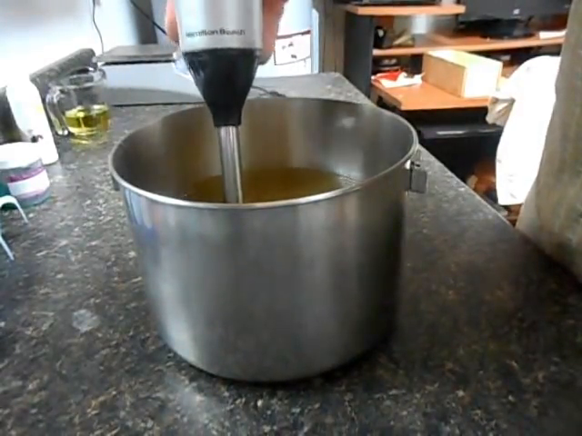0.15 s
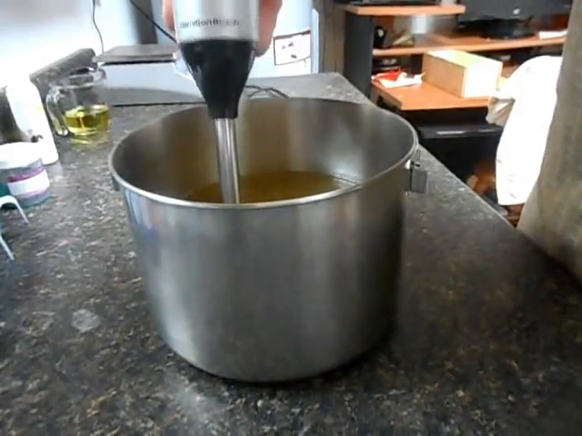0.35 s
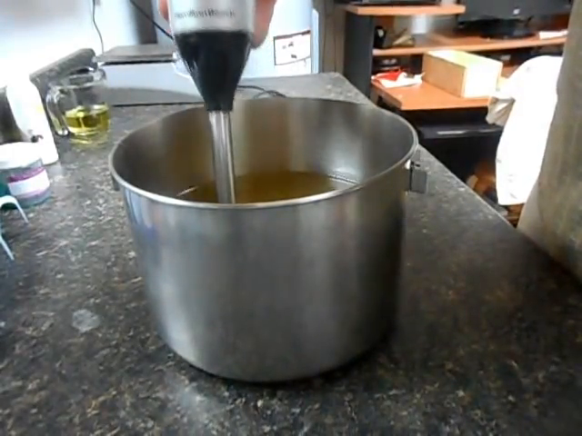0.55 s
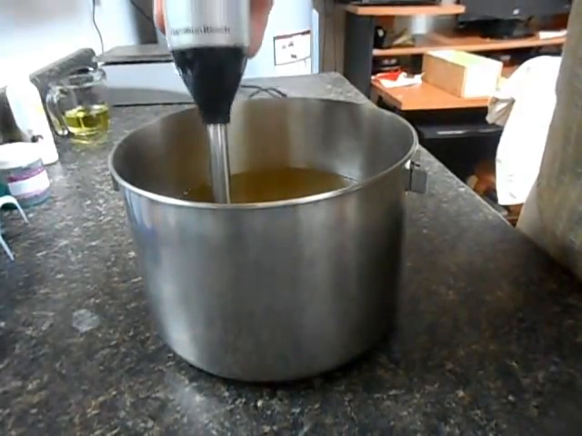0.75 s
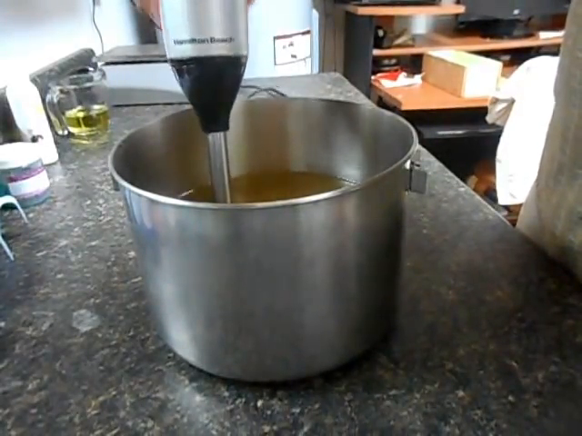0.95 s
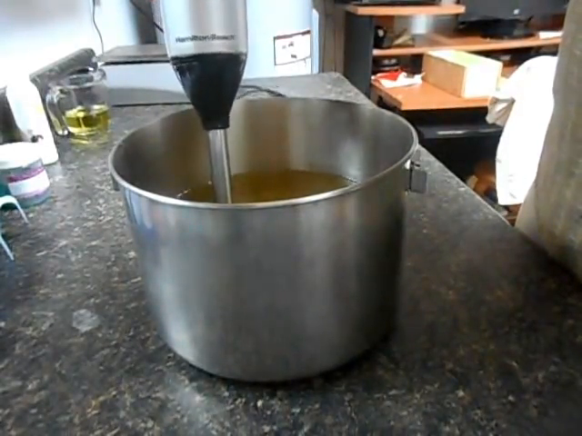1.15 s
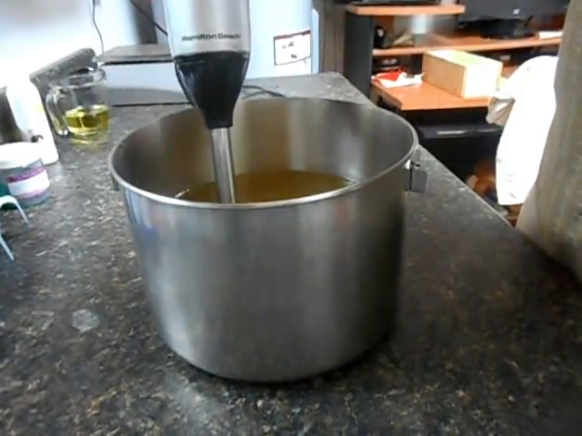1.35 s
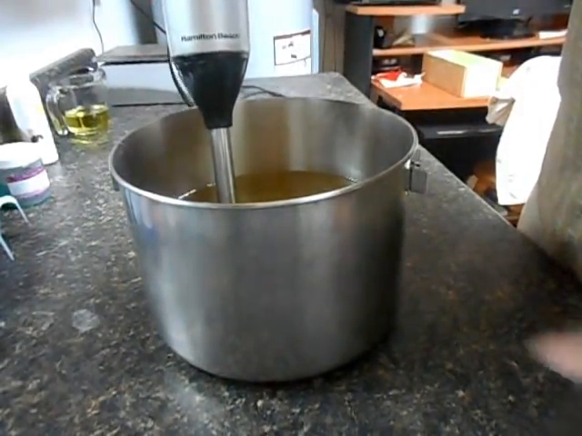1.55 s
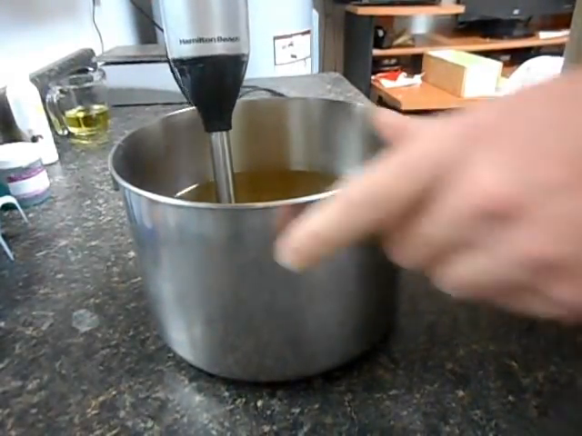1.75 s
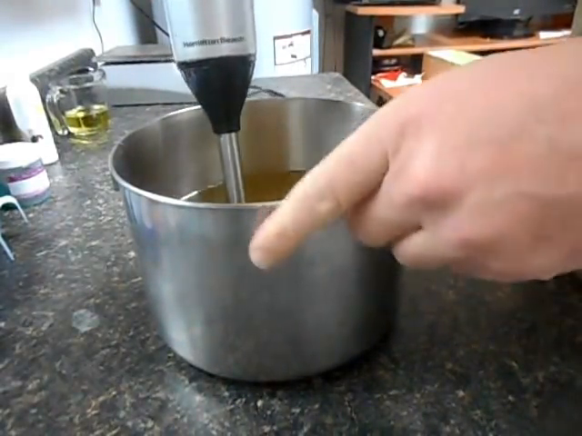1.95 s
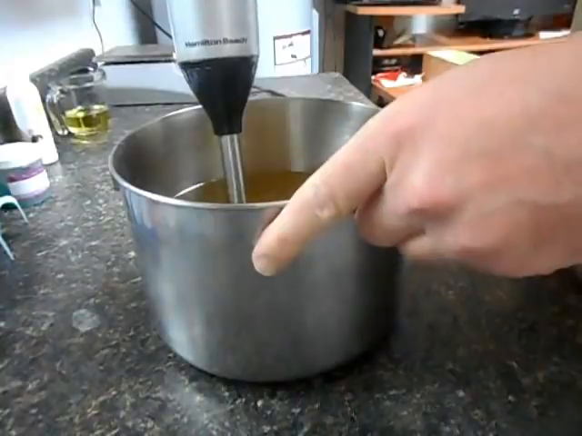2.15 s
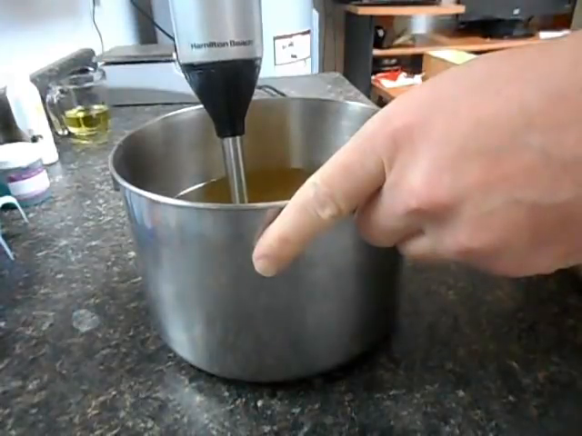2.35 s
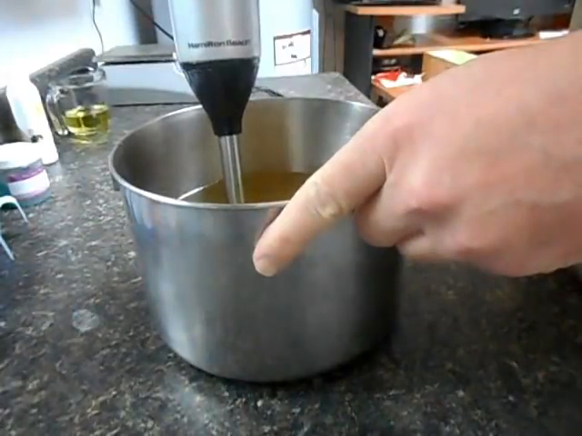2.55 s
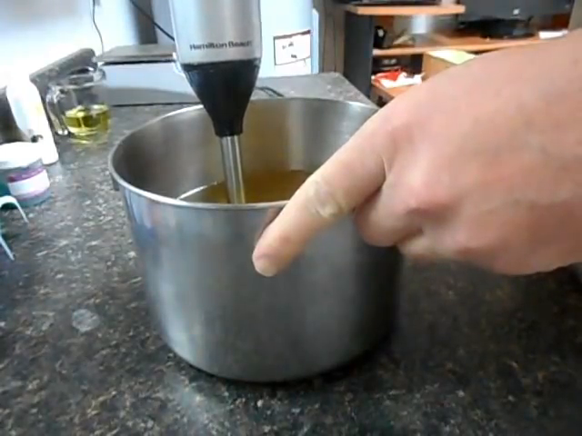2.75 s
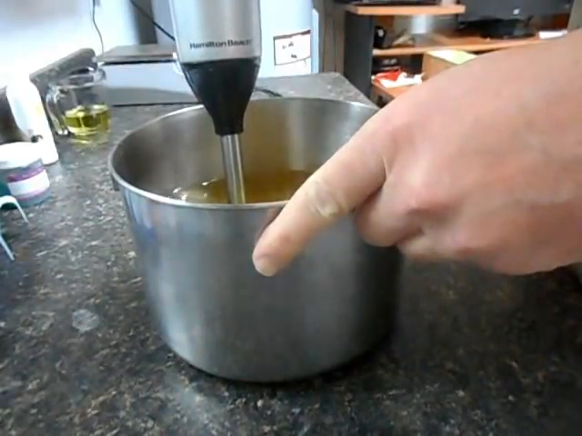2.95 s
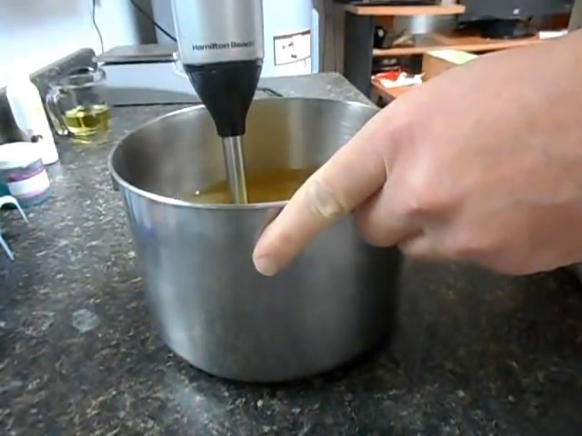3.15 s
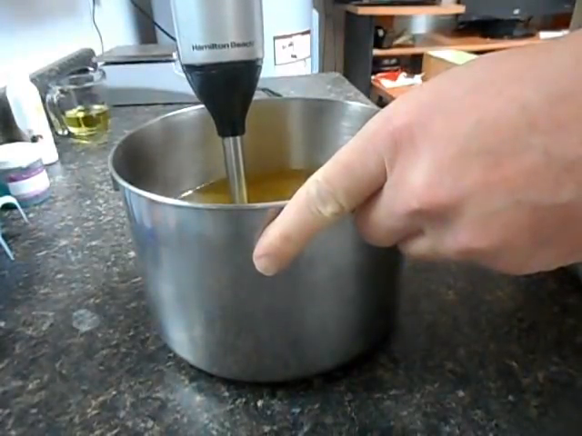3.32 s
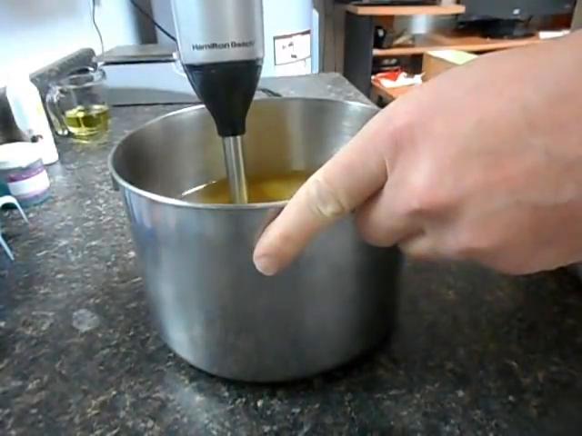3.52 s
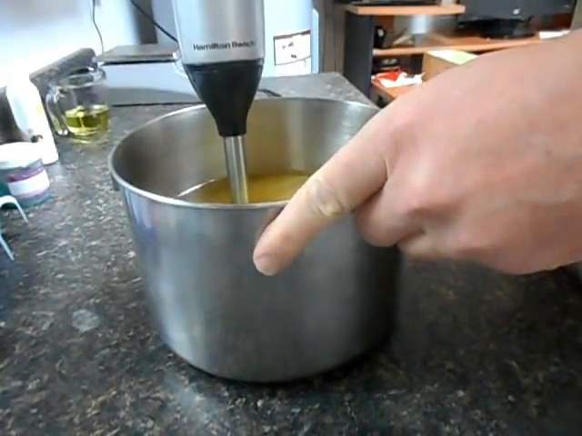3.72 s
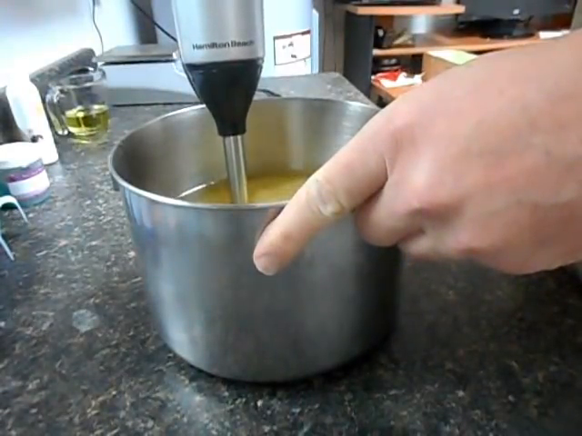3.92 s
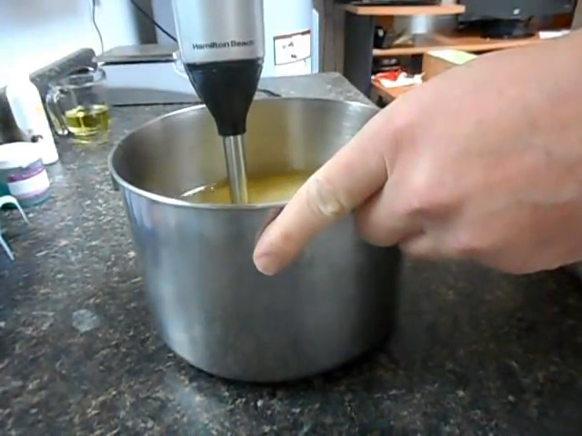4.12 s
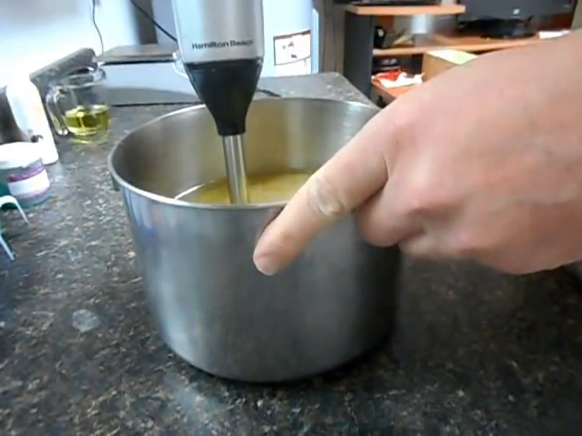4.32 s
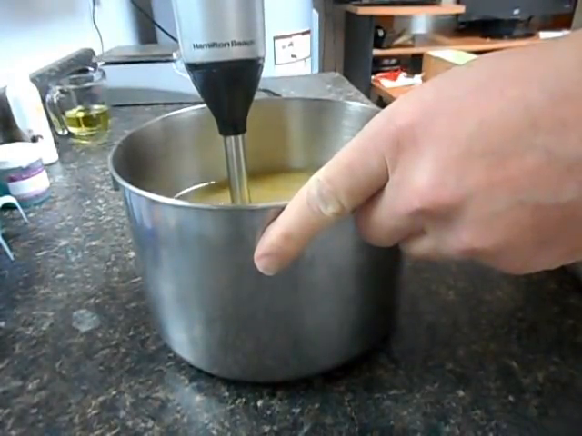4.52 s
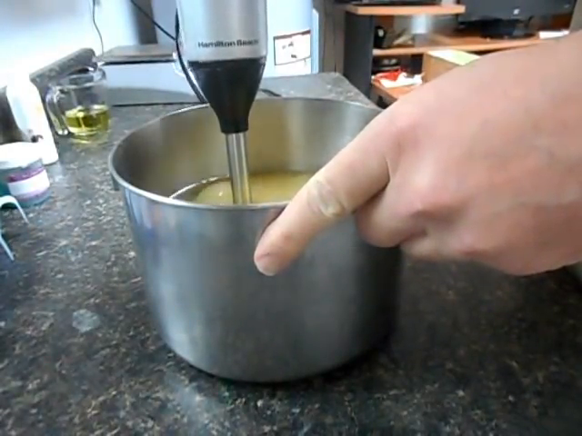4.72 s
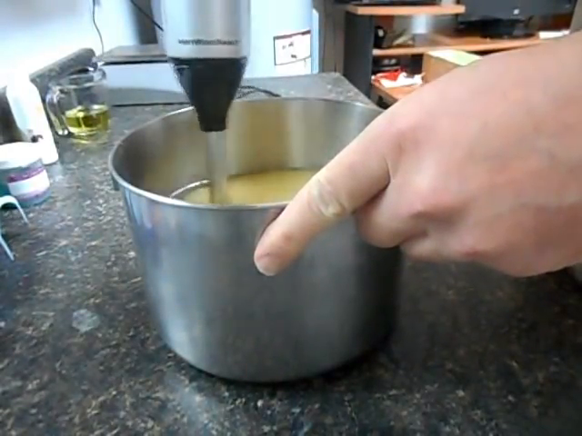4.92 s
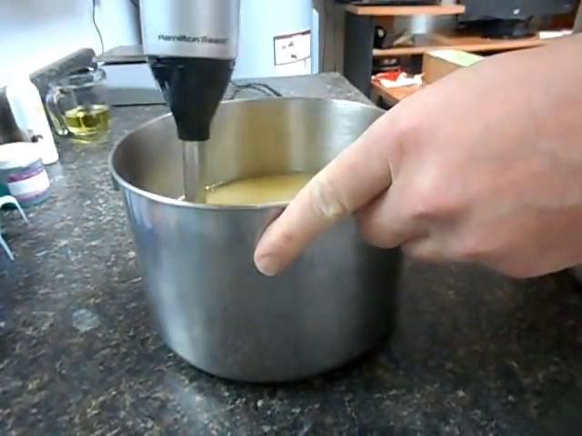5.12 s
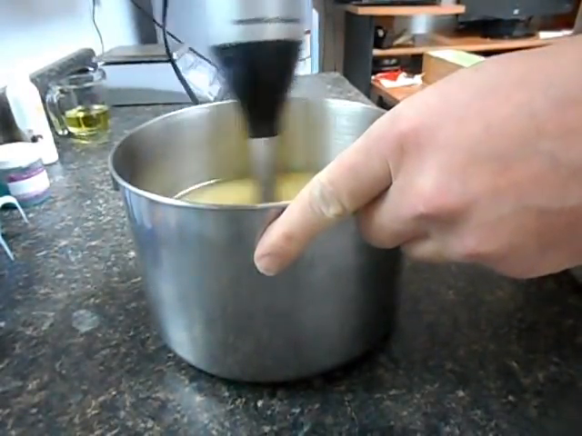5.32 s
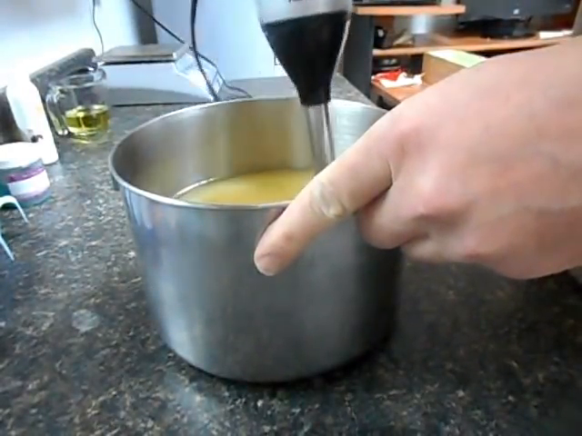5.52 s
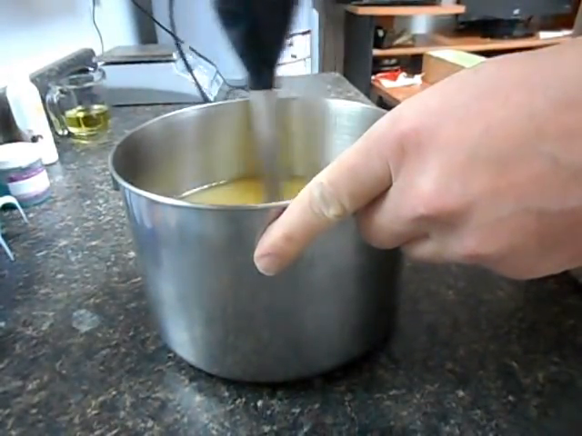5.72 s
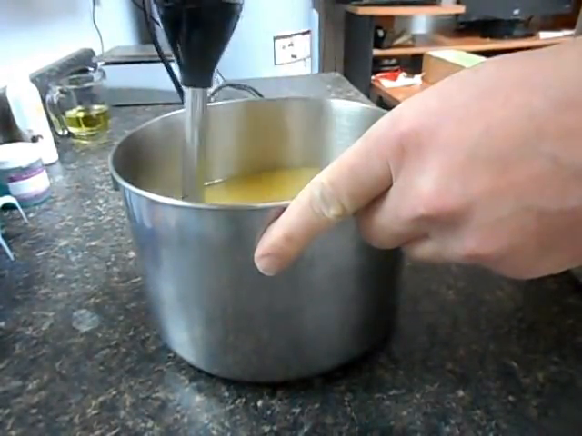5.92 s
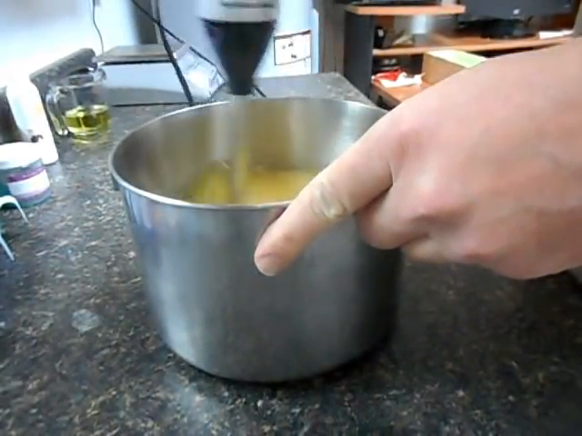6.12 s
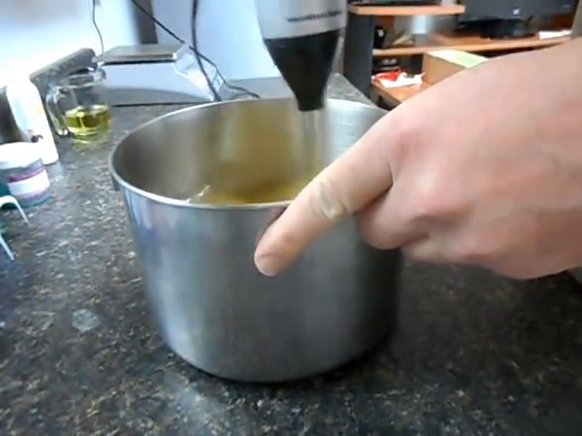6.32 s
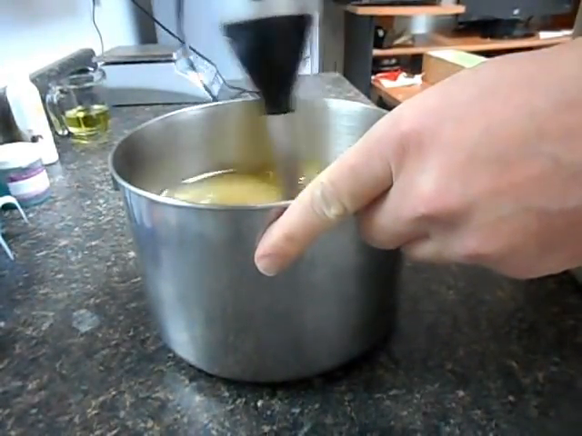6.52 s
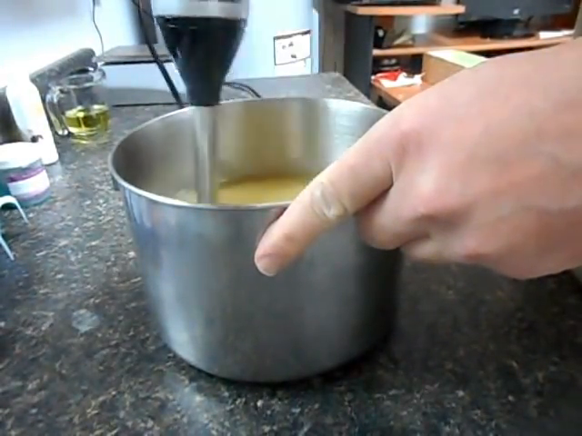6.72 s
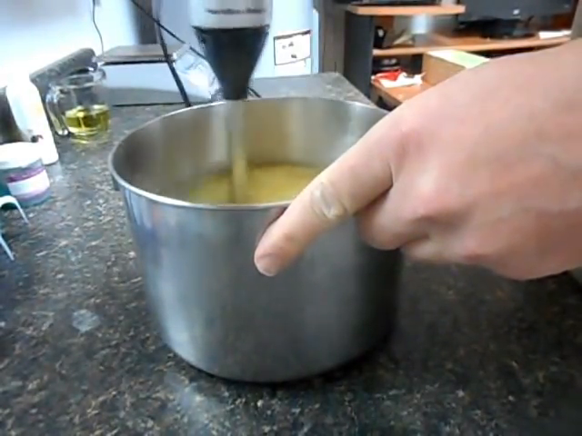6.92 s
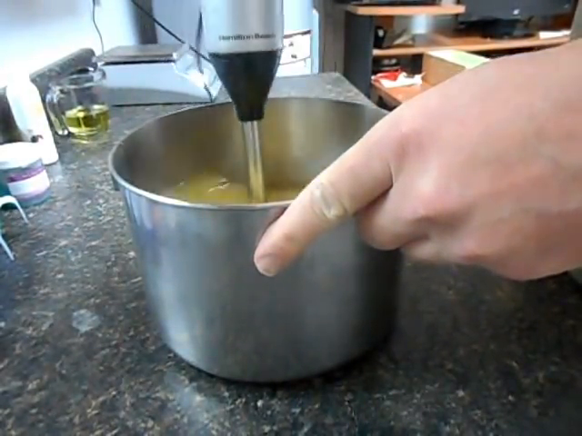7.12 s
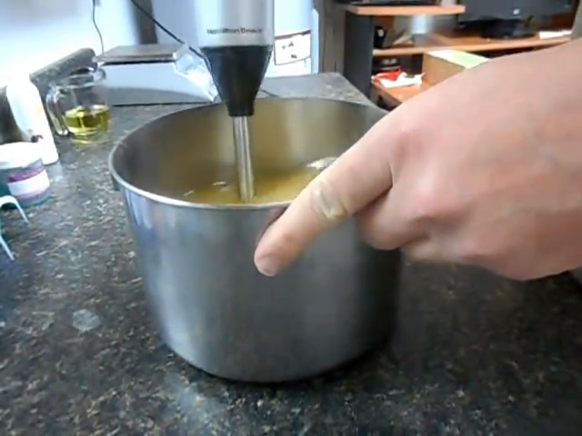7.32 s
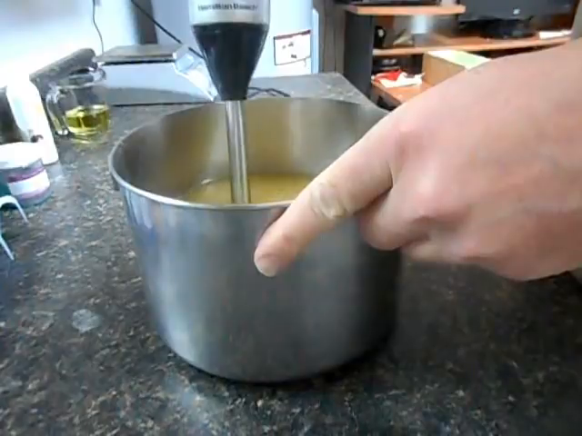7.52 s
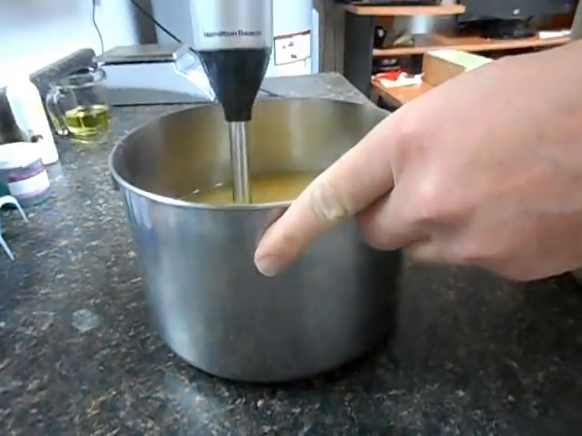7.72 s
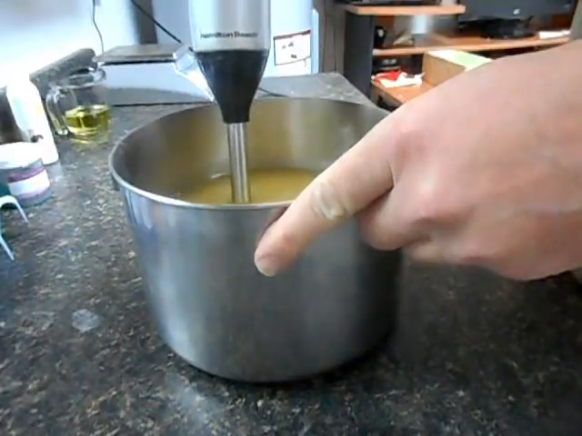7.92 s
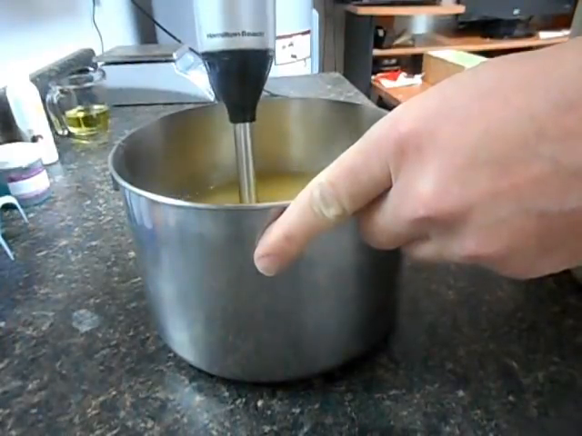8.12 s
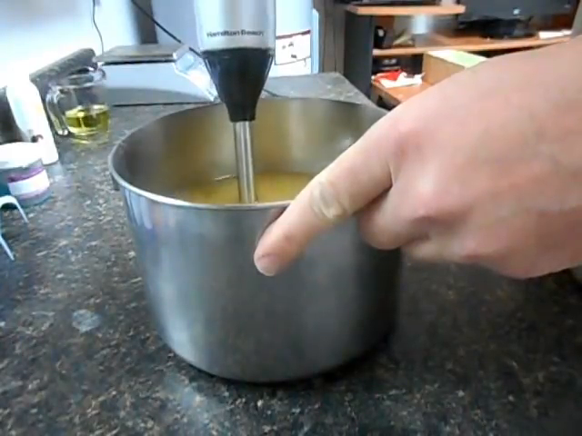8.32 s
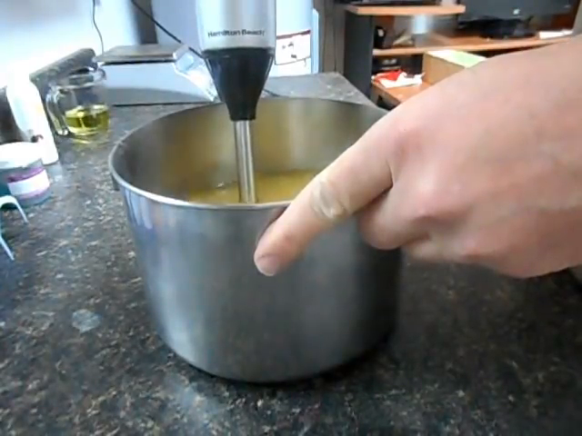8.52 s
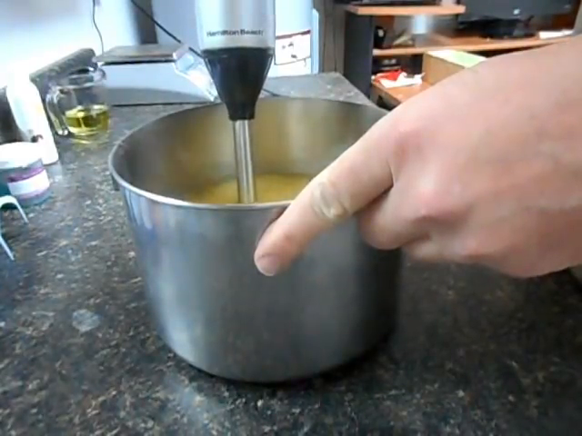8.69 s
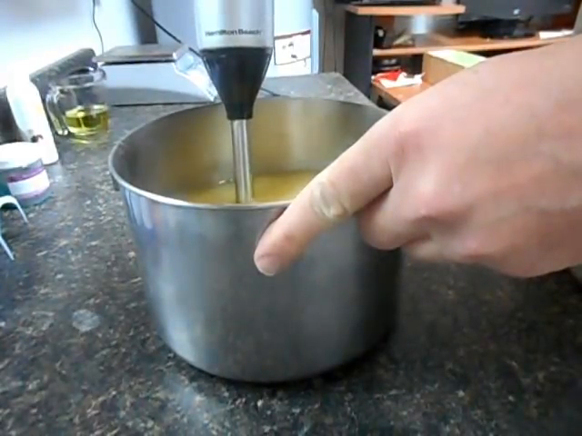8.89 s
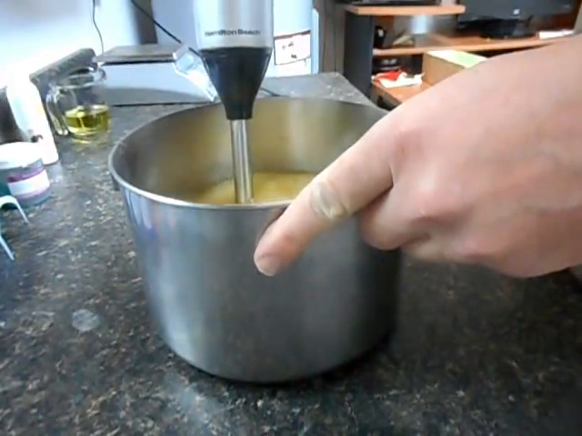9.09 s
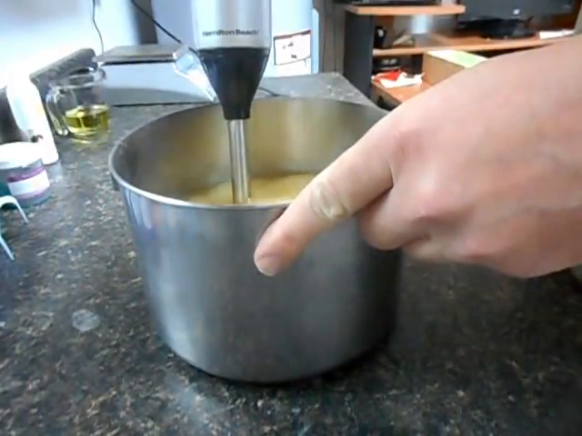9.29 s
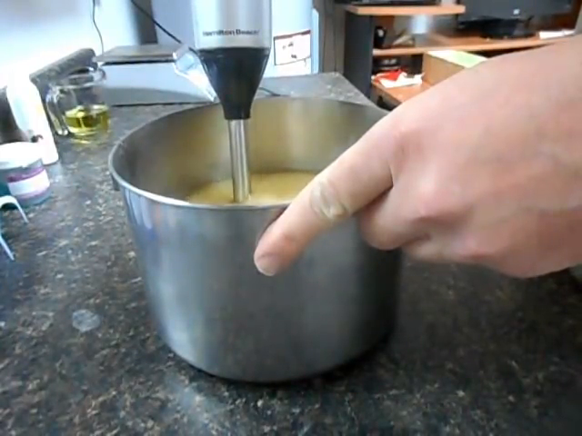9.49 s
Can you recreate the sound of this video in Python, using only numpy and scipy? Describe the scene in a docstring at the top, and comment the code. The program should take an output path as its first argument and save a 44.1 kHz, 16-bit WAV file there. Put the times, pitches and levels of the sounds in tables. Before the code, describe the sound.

A close small microphone in a kitchen with short reverberation and a low steady hiss. A gritty metal scrape at 0.2 s leads to ringing clanks on a steel pot at about 0.5 and 0.9, then light ticks. A sharp loud click near 1.9 starts a stick blender in oil: its pitch leaps up with a rattling shudder, is cut at about 2.05 and sags, grinding and gurgling. At 2.45 it spins up again and holds a steady buzz near 200 hertz under a throbbing wet roar until 4.4. Then it coasts down over about a second with a descending thin whine. Squeaky scrapes come around 5.0 to 5.1, a duller knock and scrape near 5.5, and faint taps until 7. Hard knocks and short squeaks fall at 7.2 and 7.7. At 7.95 the motor starts again, brighter, and runs steadily to the end at about 9.6.

```python
"""Knocks, scrapes and ticks on a steel pot, then a stick blender's motor run three times in oil, close by in a
kitchen. The contact sounds are excited modes of the pot: friction noise, short clicks and decaying sinusoids;
two of the ticks are the blender's trigger clicking as the motor starts from rest. The motor is a sum of
harmonics of the shaft speed in a churning roar that throbs with the turns. Each press spins the shaft up; each
release lets it coast, with commutator whine as it slows. A decaying-noise room, a steady kitchen background and
a small microphone's response complete it."""
import sys
import numpy as np
from scipy import signal
from scipy.fft import rfft, irfft, next_fast_len
from scipy.io import wavfile
from scipy.ndimage import uniform_filter1d, map_coordinates

SR = 44100
rng = np.random.default_rng(int(sys.argv[2]) if len(sys.argv) > 2 else 0)


def materialize(psi):
    """Save the field psi as 16-bit PCM at rate SR to the path in sys.argv[1].

    A 1-D psi becomes a single channel; in a 2-D psi each row is a channel.
    """
    bounded = np.clip(np.atleast_2d(psi).T, -1, 1)
    quanta = np.round(bounded * 32767).astype(np.int16)
    wavfile.write(sys.argv[1], SR, quanta)


N = 421155
T = np.arange(N) / SR  # seconds


def amp(db):
    """Decibel law: the amplitude gain of a level in dB."""
    return 10 ** (np.asarray(db) / 20)


def unit(x):
    """Normalisation of signal power: x at rms 1."""
    return x / np.sqrt(np.mean(x ** 2) + 1e-20)


def along(points, hz, axis=1):
    """Interpolation on a logarithmic frequency axis, for one column of (Hz, value, ..) points."""
    columns = np.transpose(points)
    return np.interp(np.log(hz + 1), np.log(columns[0] + 1), columns[axis])


def curves(rows, at):
    """Linear interpolation of each column after the first, which is the abscissa."""
    abscissa, *columns = np.transpose(rows)
    return [np.interp(at, abscissa, column) for column in columns]


def wobble(rate, size=N):
    """Slow random modulation: a smooth curve through `rate` random knots a second."""
    coarse_t = T[:size + 16:16]
    knots = rng.standard_normal(int(size * rate / SR) + 4)
    return np.interp(T[:size], coarse_t, map_coordinates(knots, [coarse_t * rate]))


def filtered(x, response):
    """Linear filtering: the spectrum of x times a response of frequency."""
    m = next_fast_len(len(x) + 8192)
    return irfft(rfft(x, m) * response(np.fft.rfftfreq(m, 1 / SR)), m)[:len(x)]


def noise(points, size=N, tilt_db=0):
    """Spectral shaping of white noise, to rms 1; tilt_db per octave pivots near 2 kHz."""
    def response(f):
        return amp(along(points, f) + tilt_db * np.log2((f + 50) / 2000))
    return unit(filtered(rng.standard_normal(size), response))


# Background spectrum. Each row: frequency [Hz], relative spectral density [dB].
KITCHEN_SPECTRUM = [(30, -23), (100, -9), (170, -15.5), (260, -9.5), (400, -8.5), (800, -4), (1400, -6),
                    (2000, -6), (4600, -12), (8000, -17), (16000, -28.5)]
# Background level before its random drift. Each row: time [s], level [dB].
KITCHEN_LEVEL = [(0, -53.5), (1, -55.5), (1.8, -53.5), (5.3, -49), (5.7, -55.5), (6.3, -55.5), (6.8, -56),
                 (7.6, -54), (9.55, -60)]


def kitchen_air():
    """Stationary broadband noise whose level drifts slowly: the kitchen background."""
    drift_db = .8 * wobble(6)
    return amp(curves(KITCHEN_LEVEL, T)[0] + drift_db) * noise(KITCHEN_SPECTRUM)


# Resonances of the steel pot. Each row: frequency [Hz], relative level [dB], free decay t60 [s].
POT_MODES = [(312, -26, 0.34), (470, -24.5, .25), (604, -12, 0.28), (878, -17.5, 0.23), (1140, -12.5, .2),
             (1450, -19, .2), (1790, -13, .2), (1810, -5, 0.28), (2010, -14.5, 0.59), (2164, 0, 0.067),
             (2138, 3, 0.25), (2324, -4.5, 0.66), (2570, -5.5, 0.75), (3139, -7, 0.18), (3380, -8, 0.22),
             (3560, -6.5, 0.21), (4050, -32, .25), (4860, -16.5, 0.58), (4610, -11, .25),
             (5400, -16, 0.074), (5890, -20, 0.26), (6005, -21, .2), (6600, -31, 0.32), (7440, -28, 0.1)]


def pot_hiss(wide, size):
    """Forced resonance: noise rubbed into the pot modes, which the contact broadens `wide` times."""
    def modes(f):
        total = 0
        for k, (centre, db, t60) in enumerate(POT_MODES):
            damping = 1j * f * wide / t60
            total = total + (-1) ** k * amp(db) * damping / (centre * centre - f * f + damping)
        return total
    return unit(filtered(rng.standard_normal(size), modes))


# Broad contact noise of metal on metal. Each row: frequency [Hz], relative spectral density [dB].
CONTACT_SPECTRUM = [(100, -16), (400, -4.5), (1200, 3.5), (2200, -1), (3500, -0.5), (6000, -9),
                    (9000, -18.5), (16000, -30.5)]
# Slides of the guard along the pot. Each row: loudest moment [s], rise [s], fade [s],
# level [dB], squeak pitch [Hz], squeak relative to the grit [dB].
SLIDES = [(.225, .085, .07, -25, 3300, -9), (1.18, .02, .2, -51, 1390, -6),
          (4.931, .15, 0.18, -41, 2100, -12), (5.06, .12, 0.15, -29.5, 1380, -0.5),
          (5.125, 0.092, .03, -32.5, 2100, -1), (5.505, .01, 0.12, -37.5, 985, -1),
          (7.02, 0.0092, 0.19, -50, 1150, -1), (7.2, 0.017, 0.139, -30, 1180, -2),
          (7.305, 0.015, 0.15, -36, 1250, 1), (7.639, .03, .15, -56, 854, 7),
          (7.79, 0.025, .18, -39, 745, 1), (7.866, .01, 0.074, -39, 747, -5)]
SLIDE_DB, SLIDE_ROUND = 23.5, 1.27  # dB fallen one rise or fade from the top; roundness of the top


def scrapes():
    """Dry friction: grit drives the pot modes while a rough squeak sounds; each slide swells and fades."""
    out = np.zeros(N)
    for s, rise_s, fade_s, db, squeak_hz, squeak_db in SLIDES:
        first = max(round((s - 2 * rise_s) * SR), 0)
        t = T[first:round((s + 2 * fade_s) * SR)]
        n = len(t)
        slide_db = db - SLIDE_DB * np.maximum((s - t) / rise_s, (t - s) / fade_s) ** SLIDE_ROUND
        squeak_phase = 2 * np.pi * squeak_hz * t + 2.2 * wobble(110, size=n)
        squeak = amp(squeak_db) * (1 + 0.32 * wobble(60, size=n)) * np.sin(squeak_phase)
        grit = .8 * pot_hiss(30., size=n) + .3 * noise(CONTACT_SPECTRUM, size=n)
        out[first:first + n] += amp(slide_db + 3.5 * wobble(150, size=n)) * (grit + squeak)
    return out


# Light ticks and taps, among them the trigger's click at 1.856 s and 7.945 s as the motor starts from rest.
# Each row: start [s], level [dB], note pitch [Hz], note level before the tick gain [dB], counter thud relative
# to the tick gain [dB].
TAPS = [(.118, -25.5, 1960, -6, -11), (1.081, -35, 1660, 1, -23), (1.094, -35, 1680, -9, -14),
        (1.339, -14, 2800, 1.5, -35), (1.557, -32, 3290, -10, -25), (1.673, -22.5, 1140, -14, -49),
        (1.856, -9.5, 5960, -6.5, -27), (1.938, -1, 3440, 13, -45), (2.331, -14.5, 2980, 2, -45),
        (5.129, -33.5, 1830, -6, -7), (5.266, -35.5, 4730, -9, -27), (5.578, -22, 2000, -10, -18),
        (5.608, -32.5, 1710, 7, -9), (5.953, -37.5, 1420, 5.5, -18), (5.992, -40, 1400, 8.5, -30),
        (6.116, -42.5, 1800, -4, -32), (6.352, -35, 4140, -16, -16), (6.714, -42.5, 1580, -3, -8),
        (6.832, -39, 1380, 11, -30), (6.867, -40, 1230, 1, -30), (6.901, -32.5, 1800, -1, -35),
        (6.97, -34, 1100, -9.5, -29), (7.015, -36, 1120, -1, -15), (7.032, -43, 1506, 13, -27),
        (7.147, -26.5, 1760, -15, -23), (7.375, -43, 1550, 14, -26), (7.834, -24, 3270, -6, -27),
        (7.945, -28.5, 5950, 6, -15)]
# t60 of a soft tick with a 0 dB note, s; its shortening in dB (20 log) per dB of note,
# and per dB of force above the soft level
TICK_S, TICK_SHORTENS, HARD_SHORTENS, SOFT_DB = 0.035, 0.23, 0.24, -32


def ticks():
    """Light impact: a short broad click, a damped note and a soft thud in the counter."""
    out, t = np.zeros(N + SR), T[:SR // 6]
    for s, db, hz, note_db, thud_db in TAPS:
        force_db = max(db - SOFT_DB, 0)
        t60 = TICK_S * amp(-TICK_SHORTENS * note_db - HARD_SHORTENS * force_db)
        note = amp(note_db) * np.sin(2 * np.pi * hz * t + 1.8 * wobble(500, size=len(t)))
        click = 0.45 * noise(CONTACT_SPECTRUM, size=len(t), tilt_db=4.5)
        struck = (note + click) * amp(-60 * t / t60) * (1 - np.exp(-t / 0.00091))
        thud = amp(thud_db - 60 * t / 0.078) * np.sin(2 * np.pi * 160 * t) * (1 - np.exp(-t / 0.0039))
        out[round(s * SR):][:len(t)] += amp(db) * (struck + thud)
    return out[:N]


# The two slowest wall modes, which beat together. Each row: frequency [Hz], t60 [s].
WALL_MODES = [(275, 0.12), (291, 0.23)]
# Hard knocks of the shaft on the pot. Each row: start [s], relative blow level [dB], tilt [dB per octave],
# relative ringing [dB], relative wall wobble [dB], counter thud independent of the blow [dB].
BLOWS = [(.247, -21.5, -6.5, -16, -8, -33), (.489, 2, 3, 1, -19, -42), (.867, 1, 3.5, 2, -23.5, -42),
         (.944, -18, -3, -11, -10.5, -41.5), (5.494, -20, 2, -20, -27, -67), (7.171, 1, 1.5, -16, -50, -34),
         (7.426, -18.5, -1, -15, -16, -32), (7.739, -1, 2, -1.5, -51, -41),
         (7.748, -9.5, -3.5, 4, -45, -54)]
CLANG_S = 0.034  # time for the clang to fall 60 dB
LINGER_DB, LINGER_GROWS = -24.5, -0.28  # the lasting ring grows less than the blow


def knocks():
    """Modal impact: a broad clang that drops quickly, a fluttering ring, a wobbling wall and a thud."""
    out, t = np.zeros(N + SR), T[:SR // 2]
    hz, level, long = np.transpose(POT_MODES)[:, :, None]
    fast = amp(-60 * (t / CLANG_S) ** 2)  # the clang stays full for a moment, then drops quickly
    for s, db, tilt_db, ring_db, wall_db, thud_db in BLOWS:
        linger_db = LINGER_DB + LINGER_GROWS * db
        size = amp(level + tilt_db * np.log2(hz / 2000) + rng.normal(0, 2.8, hz.shape))
        decay = fast + amp(linger_db - 12 - 60 * t / long)
        ring = size * np.sin(2 * np.pi * hz * t + rng.normal(0, 1.5, hz.shape)) * decay
        # the many close modes, heard as a shimmer
        flutter = amp(linger_db + 3 - 60 * t / .3) * pot_hiss(30., size=len(t))
        clang = noise(CONTACT_SPECTRUM, size=len(t), tilt_db=tilt_db)
        clang = clang * (fast + amp(linger_db - 2.0 - 60 * t / .25))
        wall = sum(np.sin(2 * np.pi * f * t) * amp(-60 * t / slow) for f, slow in WALL_MODES)
        thud = amp(thud_db - 60 * t / 0.19) * np.sin(2 * np.pi * 167 * t)
        blow = clang + amp(ring_db) * (ring.sum(0) + flutter) + amp(wall_db + 8.0) * wall
        onset = 1 - np.exp(-t / 0.00075)
        out[round(s * SR):][:len(t)] += (amp(db - 10.0) * blow + thud) * onset
    return out[:N]


# Presses of the trigger. Each row: on [s], off [s], settled full speed [turns per s], spin-up time [s].
TRIGGER = [(1.856, 2.055, 200, .18), (2.452, 4.42, 198.6, .14), (7.951, 9.6, 196.6, .15)]
KICK = 62  # turns per s that the rotor leaps to from rest
OVERSHOOT, SETTLE_S = .014, .35  # share over full speed until the oil is dragged along; its time constant
COAST_S, DRAG = .5, 25  # speed plus the friction term DRAG (turns per s) dies with time constant COAST_S


def shaft():
    """Rotational dynamics: spin-up against oil, then coasting against friction; speed, drive, last press."""
    hz, press = np.zeros(N), np.zeros(N, int)
    for k, (on, off, full, spin_s) in enumerate(TRIGGER):
        start = np.arctanh(max(hz[round(on * SR)], KICK) / full)
        top = full * (1 + OVERSHOOT * np.exp(-np.clip(T - on, 0, None) / SETTLE_S))
        driven = top * np.tanh(start + (np.minimum(T, off) - on) / spin_s)
        after = (driven + DRAG) * np.exp(-np.clip(T - off, 0, None) / COAST_S) - DRAG
        hz = np.where(T >= on, np.clip(after, 0, None), hz)
        press = np.where(T >= on, k, press)
    off_s = np.transpose(TRIGGER)[1][press]
    power = uniform_filter1d(1. * (T < off_s) * (hz > 0), size=1800)
    return hz, power, press


# Body response to the shaft orders. Each row: frequency [Hz],
# relative level in the first two presses [dB], relative level in the third press [dB].
BODY = [(50, -27, -20), (109, -17.5, -16), (156, -10, -13), (207, -17.5, -20.5), (309, -6, -12.5),
        (388.5, -16.5, -12), (463, 2, -7.5), (590, 0, -14.5), (800, -0.5, -16), (1000, -6, -55),
        (1192, 0, 4), (1380, -4, -5), (1800, -1.5, -3), (2800, -4, -11)]
# Brief changes of one shaft order. Each row: centre [s], order [multiple of shaft speed],
# level change [dB], Gaussian half length [s].
ORDER_SWELLS = [(2.83, 4, 10, .13), (2.76, 3, -8, .1), (8.1, 1, 10, .04), (8.24, 3, 10, .16),
                (8.25, 4, 6, .2)]
WALL_LIFT_DB, WALL_LIFT_HZ, WALL_WIDTH_HZ = 5.5, 330, 31  # an order sweeping through the wall modes is lifted
SLOSH = .6  # cap on the smear of the orders once the oil sloshes round a slowing blade


def shaft_orders(hz, turn, power, press, rough, low_db, upper_db):
    """Harmonics of rotation: sines at multiples of the shaft angle, coloured by the body resonances."""
    hum = np.zeros(N)
    slosh = (1 - power) * np.clip(3 * (1 - hz / hz.max()), 0, SLOSH)
    for k in range(1, 15):
        body_db = np.where(press < 2, along(BODY, k * hz, axis=1), along(BODY, k * hz, axis=2))
        size = (low_db if k < 4 else upper_db) - 3.5 + body_db + 1.5 * wobble(9)
        size += WALL_LIFT_DB * np.exp(-((k * hz - WALL_LIFT_HZ) / WALL_WIDTH_HZ) ** 2)
        for s, order, db, half in ORDER_SWELLS:
            if round(order) == k:
                size += db * np.exp(-((T - s) / half) ** 2)
        smear = np.maximum(rough, slosh) * min(k - 1, 4) * wobble(50) * .75
        hum += amp(size) * np.sin(k * turn + smear + 2 * np.pi * rng.random())
    return hum


MAINS_HZ, SIDEBAND_DB = 60, -21


def mains_sidebands(turn, power, rough):
    """Modulation by the supply: under power, orders 4-7 each gain a tone one mains step below."""
    out = np.zeros(N)
    for k in range(4, 8):
        phase = k * turn - 2 * np.pi * MAINS_HZ * T + wobble(20)
        out += power * (1 - rough) * amp(SIDEBAND_DB + 3.5 * wobble(12)) * np.sin(phase)
    return out


# How well the housing lets the whine out. Each row: frequency [Hz], relative level [dB].
HOUSING_RESPONSE = [(1500, -25), (2800, -8), (3500, 0), (4400, -1), (5200, 0), (7000, -7), (9000, -16),
                    (12000, -40)]
# Brush whine while coasting. Each row: shaft speed [turns per s], relative level [dB].
BRUSH_WHINE = [(22, -60), (32, -12), (45, -1), (118, -2), (132, -14), (165, -40)]
BARS = 11  # commutator bars


def commutator_whine(hz, turn, power, grind):
    """Periodic contact: brushes tick over the bars as the motor coasts, giving multiples of the bar rate."""
    out = np.zeros(N)
    audible = (power < .5) & (hz > BRUSH_WHINE[0][0]) & (hz < BRUSH_WHINE[-1][0])
    ticking = np.flatnonzero(audible)
    for k in BARS * np.arange(3, 13):
        size = along(HOUSING_RESPONSE, k * hz[ticking]) + curves(BRUSH_WHINE, hz[ticking])[0]
        size += 3 * wobble(25)[ticking] - 5 * (k % 2) - 4 * abs(np.log2(k / 44))
        out[ticking] += (1 - grind[ticking]) * amp(size) * np.sin(k * turn[ticking])
    return out


# Churn and brush roar before its tilt. Each row: frequency [Hz], relative spectral density [dB].
ROAR_SPECTRUM = [(30, -57), (130, -15.5), (220, -43.5), (320, -18.5), (420, -15.5), (700, -9), (880, -6.5),
                 (1050, -5.5), (1250, -1), (2200, 0), (3600, 0.5), (4600, -1), (5800, -7.5), (8000, -17),
                 (16000, -30)]


def roar(bright_db, patchy_db):
    """Turbulence noise: its spectral tilt follows the brightness, with patches of random gain."""
    n = len(bright_db)
    hz, t, z = signal.stft(noise(ROAR_SPECTRUM, size=n), SR, nperseg=512)
    patches = uniform_filter1d(uniform_filter1d(rng.standard_normal(z.shape), 6, 0), 8, 1)
    tilt = amp(np.outer(np.log2((hz + 50) / 3000), np.interp(t, T[:n], bright_db)))
    return signal.istft(z * tilt * amp(patchy_db * unit(patches)), SR, nperseg=512)[1][:n]


GRIND_CHURN_DB = -6.5  # grinding thins the churn


def churn(turn, rough, grind, bright_db):
    """Amplitude modulation: blade passes the guard slots and the roar throbs one, two and three times a turn."""
    throb = 1 + 0.13 * np.cos(turn) + 0.3 * np.cos(2 * turn + 1) + 0.075 * np.cos(3 * turn + 2)
    unrest = amp((0.5 + 0.83 * rough) * wobble(30))
    return unrest * throb * amp(GRIND_CHURN_DB * grind) * roar(bright_db, patchy_db=1.5)


# Oil slapping in the guard. Each row: frequency [Hz], relative spectral density [dB].
GURGLE_SPECTRUM = [(500, -26), (950, -2), (1800, -9.5), (3500, -3.5), (5500, -28.5)]
GRIND_GURGLE_DB, GRIND_BEAT = 5.5, 0.73  # grinding lifts the gurgle and beats it once a turn


def gurgle(turn, rough, grind):
    """Irregular liquid impact: band noise in surges, for oil slapping in the guard."""
    surges = amp(GRIND_GURGLE_DB * grind + 7.5 * np.tanh(wobble(60)))
    beat = 1 + GRIND_BEAT * grind * np.cos(turn)
    return 0.65 * rough * surges * beat * noise(GURGLE_SPECTRUM)


SHUDDER_RATTLE = 0.99  # rattle dB gained per dB of shudder


def rattle(rattle_db, shudder_db, rough):
    """Chattering contact: the guard excites the modes of the pot from its floor, in uneven bursts."""
    bursts_db = (3.5 + 4 * rough) * np.tanh(wobble(45))
    return amp(rattle_db + SHUDDER_RATTLE * shudder_db + bursts_db) * pot_hiss(30., size=N)


# The mix by speed, under power and while coasting. Each row: speed [turns per s], roar [dB],
# low shaft orders [dB], upper orders [dB], brightness [dB per octave], rattle [dB], roughness [0-1];
# all are relative settings to which each press adds its own.
DRIVEN_MIX = [(60, 1.5, -14.5, -18, 5.5, -11, 1), (95, 1, 1, -12.5, 1.5, -2.5, 1),
              (125, -5, -0.5, -11.5, 4.5, -11.5, 1), (167, -1.5, -10.5, -3.5, 3, -9.5, 0.7),
              (199.3, 0, -6, -9, 1, -15, 0)]
COASTING_MIX = [(4.95, -62, -8, -13, -12, -5, .5), (25.5, -33.5, -29, -44, 4, -8, .5),
                (55, -15, 0, -16, 3, -9, 0.4), (90, -9, 2, -5.5, 4, -0.5, 0),
                (150, -2, -6, -6.5, 2, -7.5, 0), (195, -2.5, -5, -5, 3, -20, 0.53)]
# How each press sounds. Each row: overall level [dB], added brightness [dB per octave], shudder [dB],
# shudder speed [turns per s], shudder width [turns per s], coast-down grinding on the pot floor [0-1].
PRESS_SOUND = [(-20, -1.5, 11.5, 149, 35, 0.8), (-19, 0, 5.5, 140, 35, 0.39), (-19, 1.5, 8, 145, 24, 0.06)]
GRIND_DB, GRIND_BRIGHT_DB = -0.5, 6.5  # level in dB and brightness in dB per octave that grinding adds
GRIND_HOLD = 0.7  # share of the coast-down fade that grinding holds off


def motor():
    """Phase locking: orders, whine, throbbing roar and grinding beat all follow one shaft angle."""
    hz, power, press = shaft()
    press_columns = np.transpose(PRESS_SOUND)[:, press]
    level_db, tone_db, shudder_db, critical, width, grind = uniform_filter1d(press_columns, size=2000)
    # grinding dies away a little late
    grind = uniform_filter1d(np.clip(grind, 0, 1) * (1 - power), size=2400, origin=1100)
    held = 1 - GRIND_HOLD * grind
    turn = 2 * np.pi * np.cumsum(hz * (1 + .002 * wobble(12))) / SR
    mix = power * curves(DRIVEN_MIX, hz) + (1 - power) * curves(COASTING_MIX, hz)
    roar_db, low_db, upper_db, bright_db, rattle_db, rough = mix
    rough = np.clip(rough + grind, 0, 1)
    # the level lifts as the driven shaft passes its critical speed
    shudder = power * shudder_db * np.exp(-((hz - critical) / width) ** 2)
    tones = shaft_orders(hz, turn, power, press, rough, low_db, upper_db)
    tones += mains_sidebands(turn, power, rough)
    tones += commutator_whine(hz, turn, power, grind)
    brightness = held * bright_db + tone_db + GRIND_BRIGHT_DB * grind
    rush = churn(turn, rough, grind, brightness) + gurgle(turn, rough, grind)
    chatter = rattle(rattle_db, shudder, rough)
    turning = uniform_filter1d(1. * (hz > 0), size=700, origin=349)  # it takes a moment to speak from rest
    gain_db = level_db + held * roar_db + shudder + GRIND_DB * grind - 1.5
    return turning * amp(gain_db) * (rush + chatter + tones)


# Reverberation of the kitchen. Each row: frequency [Hz], t60 [s].
ROOM_DECAY = [(200, 0.58), (2000, 0.31), (10000, 0.23)]


def room(x):
    """Diffuse reverberation: convolution with noise in which each frequency dies at its own speed."""
    hz, t, z = signal.stft(rng.standard_normal(SR // 2), SR, nperseg=256)
    tail = signal.istft(z * amp(-60 * t / along(ROOM_DECAY, hz)[:, None]), SR, nperseg=256)[1]
    delayed = np.pad(x, (300, 0))  # samples before the first reflection
    return signal.fftconvolve(delayed, tail / np.linalg.norm(tail))[:N]


def scene():
    """Superposition: pot contacts and blender, their reverberation and the kitchen background."""
    near = scrapes() + ticks() + knocks() + motor()
    return (near + amp(-11) * room(near) + kitchen_air())[None]


# Small microphone with thin bass and a port notch. Each row: frequency [Hz], response [dB].
MIC_RESPONSE = [(20, -11.5), (90, -1.5), (7000, -0.5), (9500, -7), (10500, -21.5), (11200, -47),
                (11800, -14.5), (13000, -6), (15500, 1)]
TOP_HZ = 15908  # upper band limit


def record(dry):
    """Transducer response: microphone colour, soft saturation at full scale, then a band limit."""
    x = filtered(dry[0], lambda f: amp(along(MIC_RESPONSE, f)))
    x = x / (1 + np.abs(x) ** 8) ** (1 / 8)
    return filtered(x, lambda f: 1. * (f < TOP_HZ))[None]


dry = scene()
out = record(dry)
materialize(out)
```